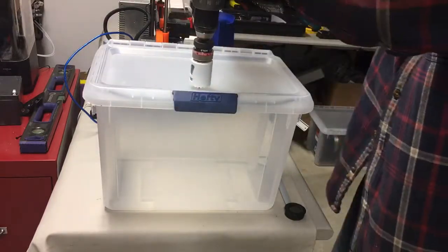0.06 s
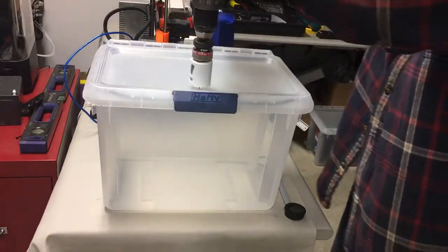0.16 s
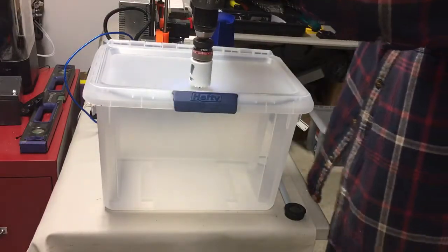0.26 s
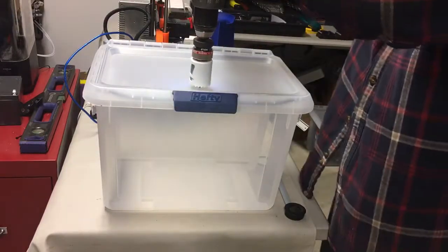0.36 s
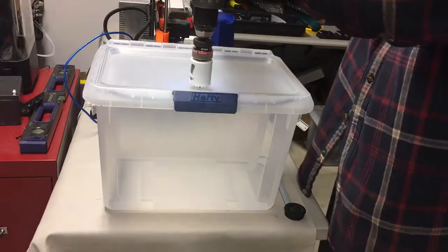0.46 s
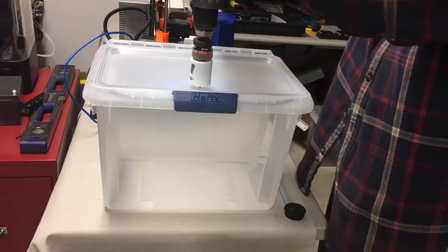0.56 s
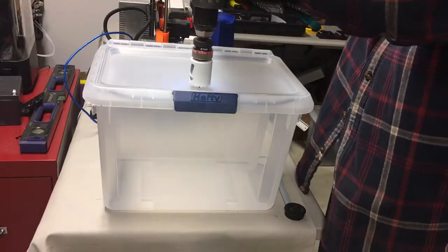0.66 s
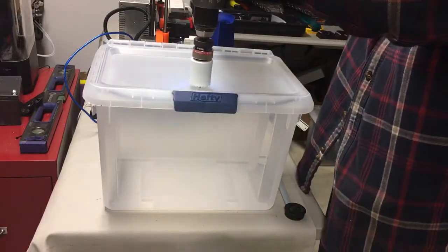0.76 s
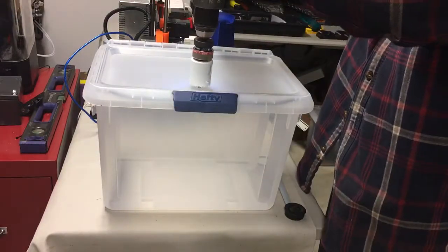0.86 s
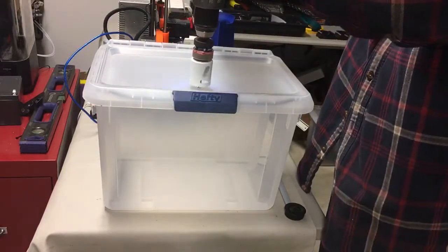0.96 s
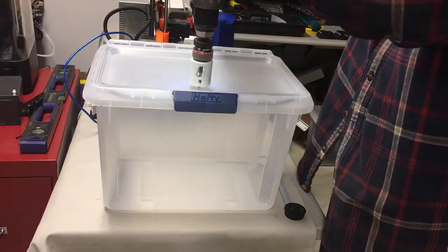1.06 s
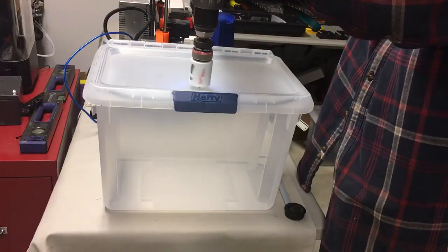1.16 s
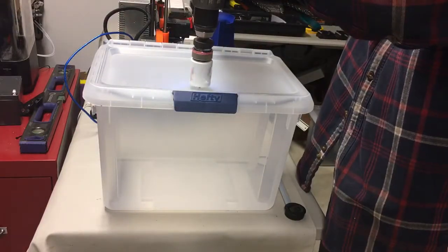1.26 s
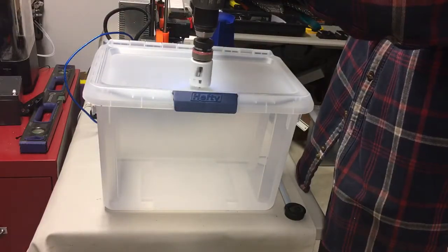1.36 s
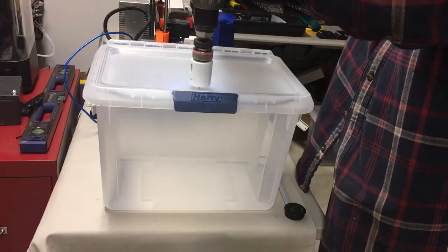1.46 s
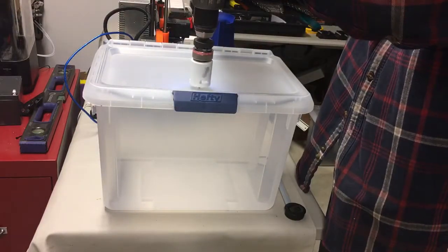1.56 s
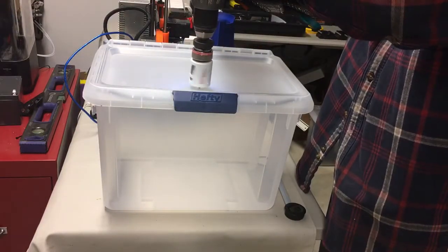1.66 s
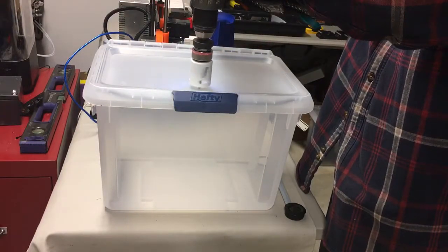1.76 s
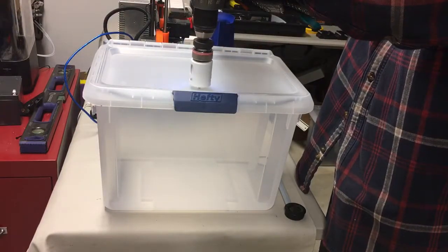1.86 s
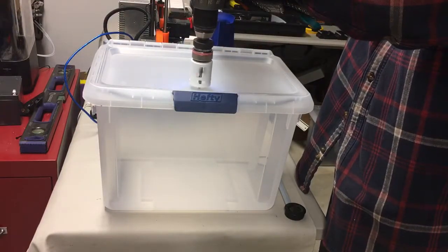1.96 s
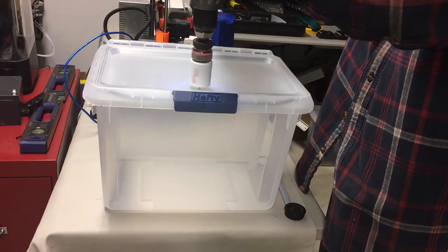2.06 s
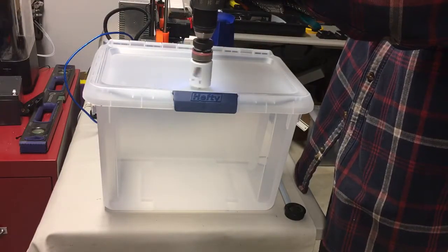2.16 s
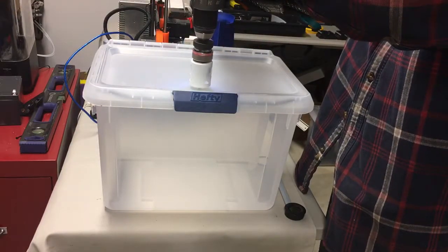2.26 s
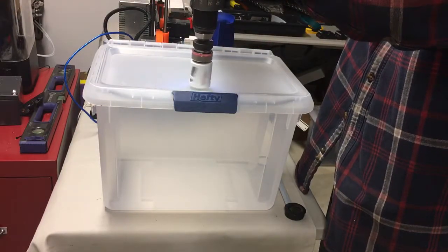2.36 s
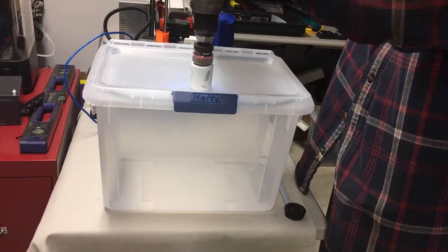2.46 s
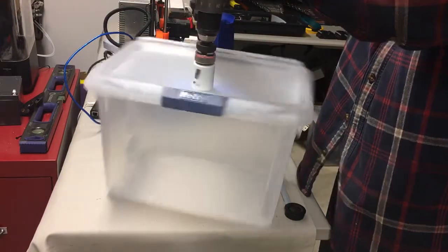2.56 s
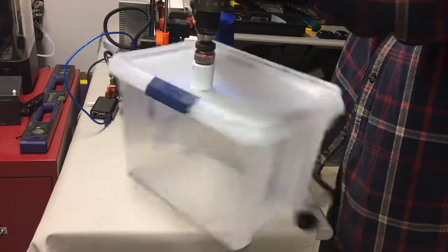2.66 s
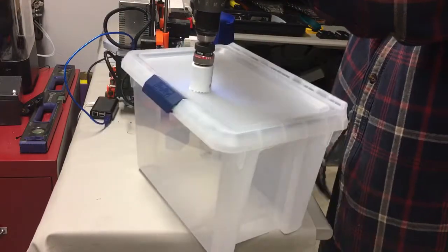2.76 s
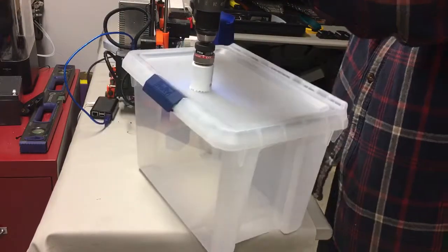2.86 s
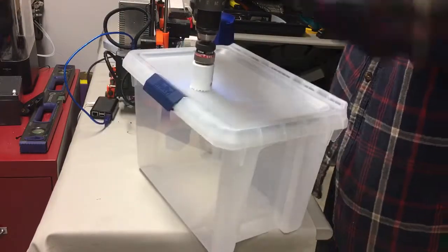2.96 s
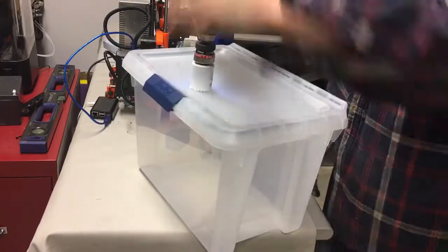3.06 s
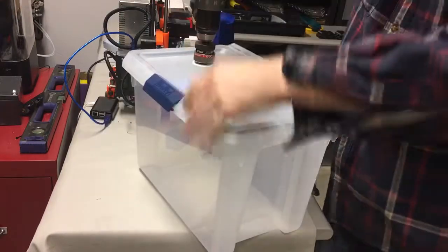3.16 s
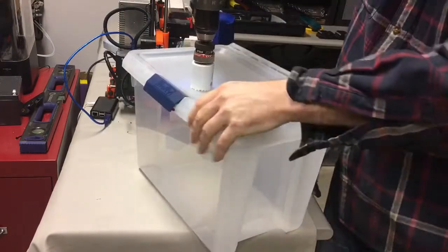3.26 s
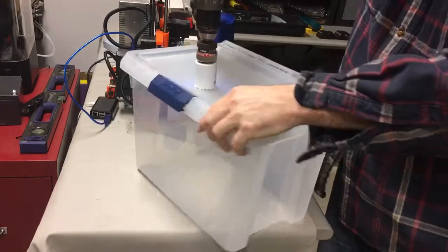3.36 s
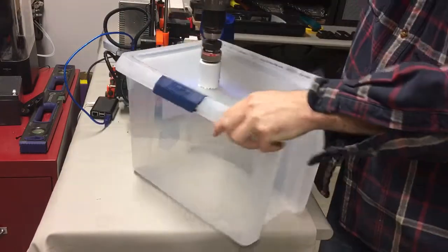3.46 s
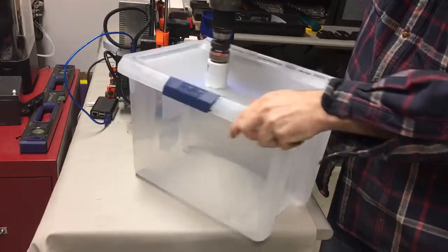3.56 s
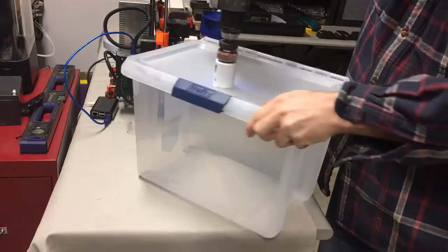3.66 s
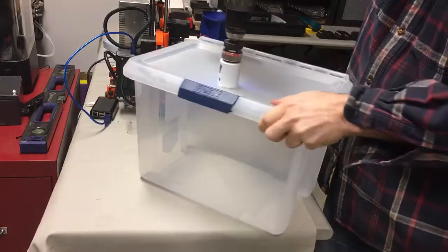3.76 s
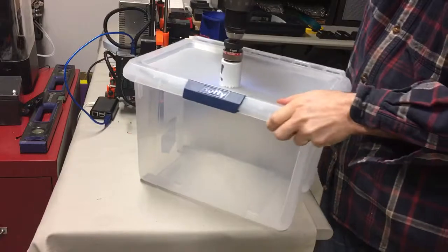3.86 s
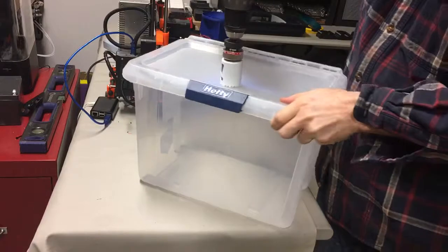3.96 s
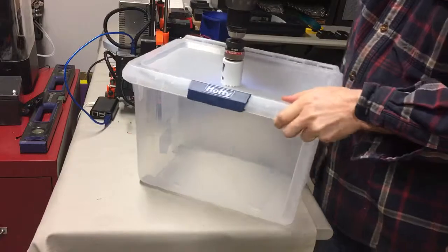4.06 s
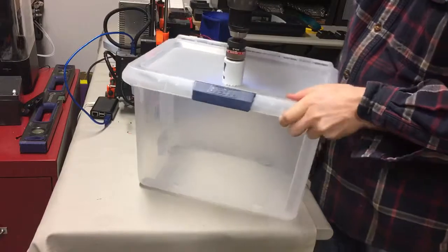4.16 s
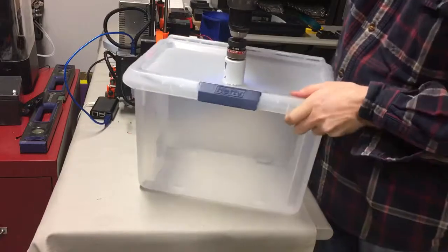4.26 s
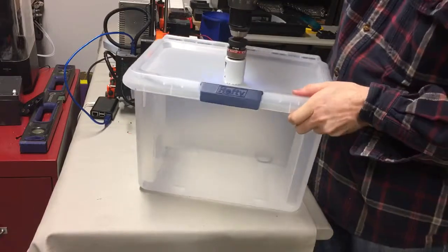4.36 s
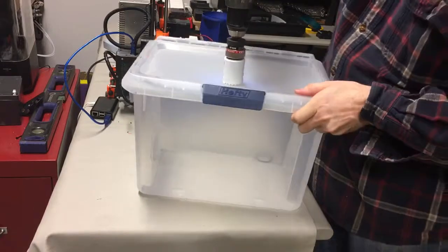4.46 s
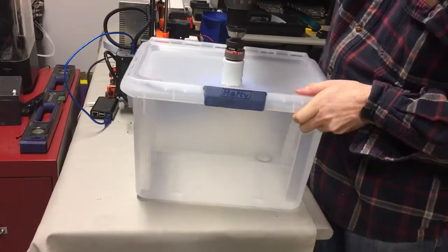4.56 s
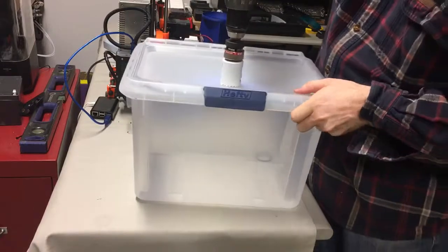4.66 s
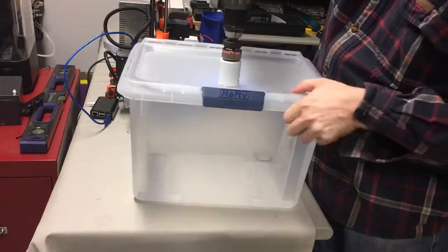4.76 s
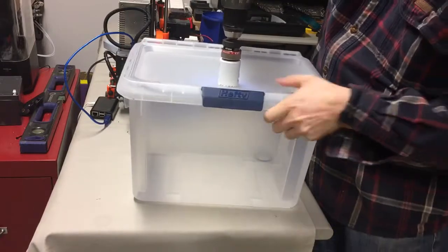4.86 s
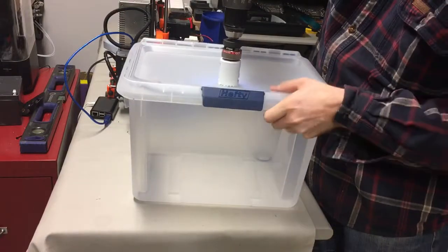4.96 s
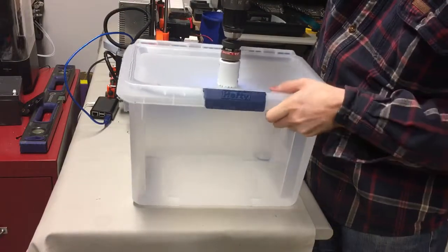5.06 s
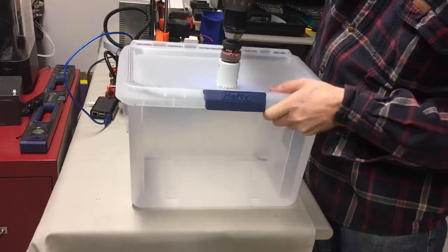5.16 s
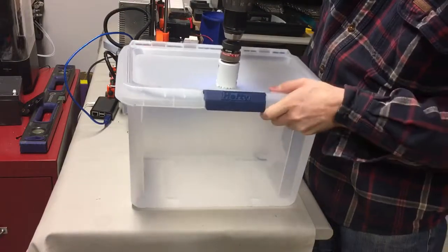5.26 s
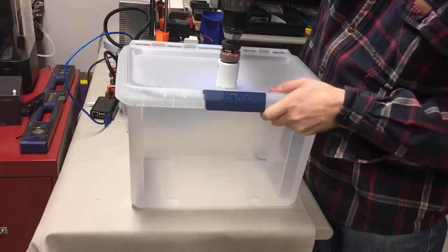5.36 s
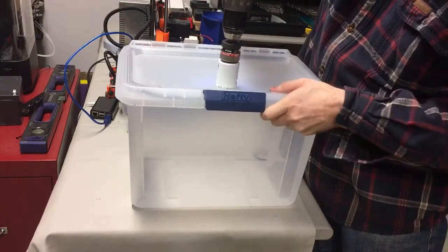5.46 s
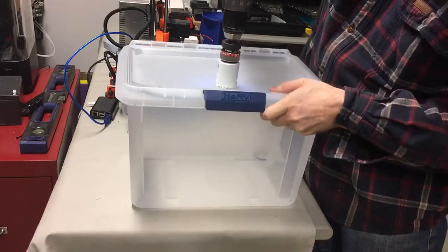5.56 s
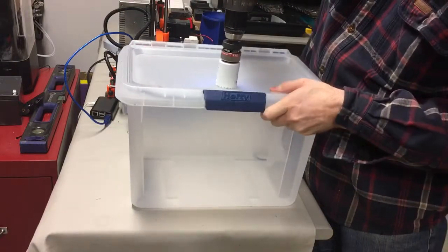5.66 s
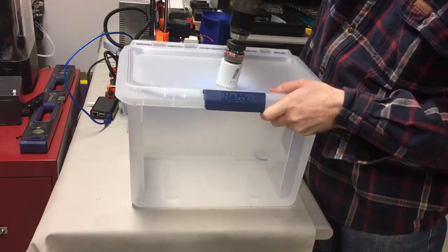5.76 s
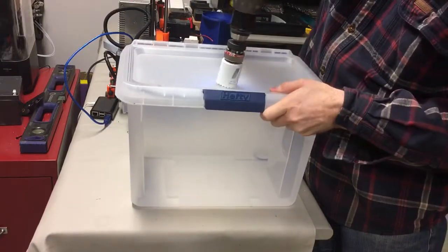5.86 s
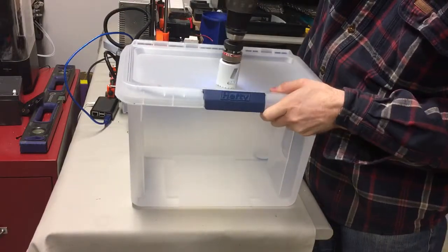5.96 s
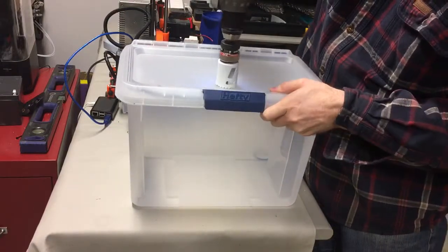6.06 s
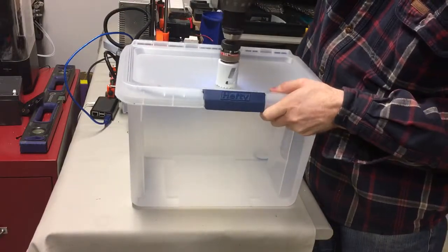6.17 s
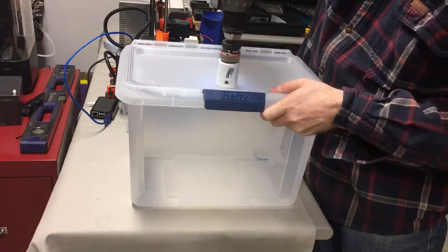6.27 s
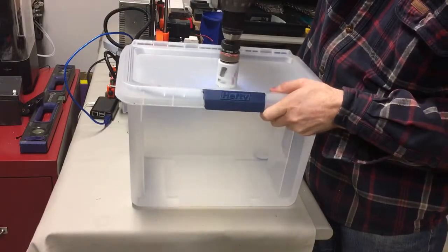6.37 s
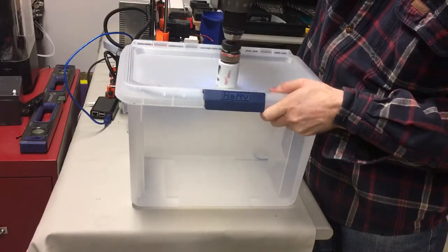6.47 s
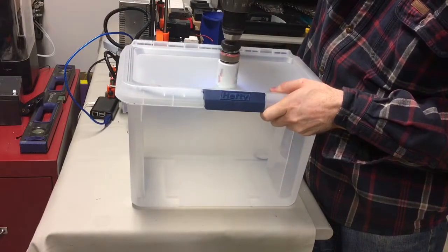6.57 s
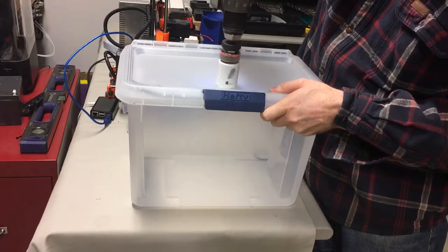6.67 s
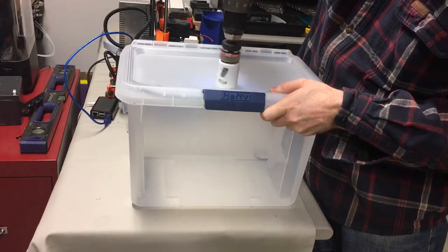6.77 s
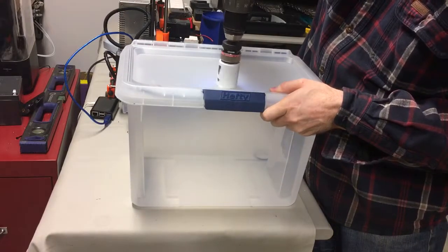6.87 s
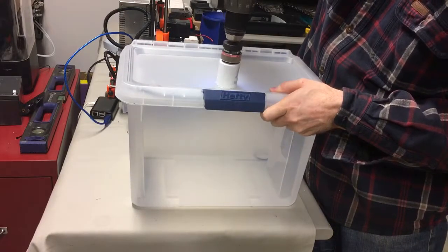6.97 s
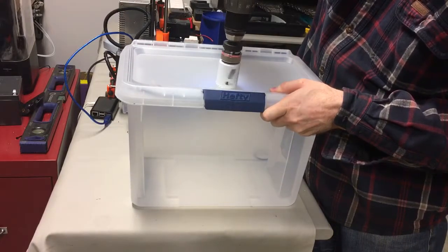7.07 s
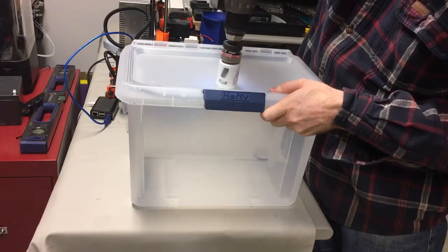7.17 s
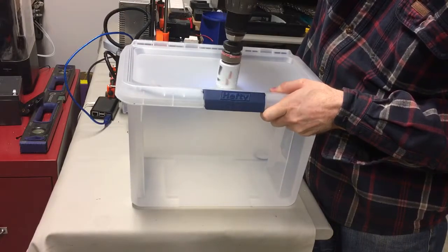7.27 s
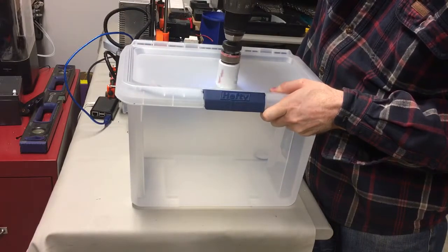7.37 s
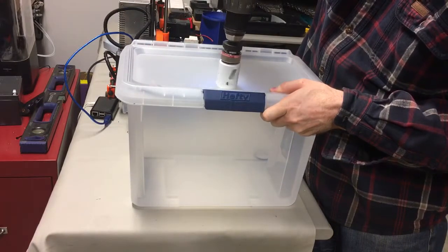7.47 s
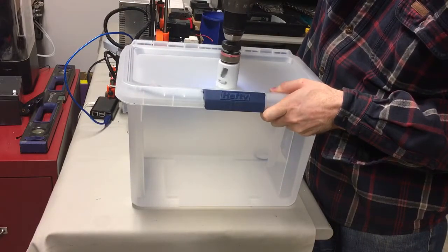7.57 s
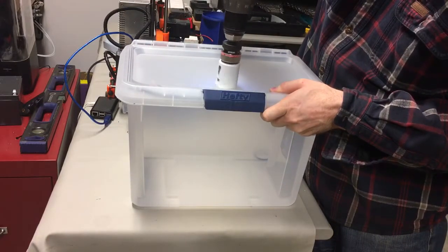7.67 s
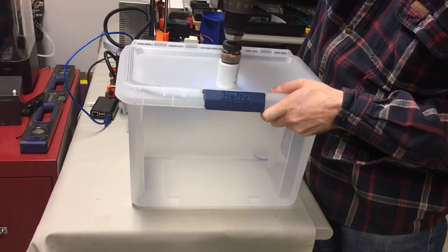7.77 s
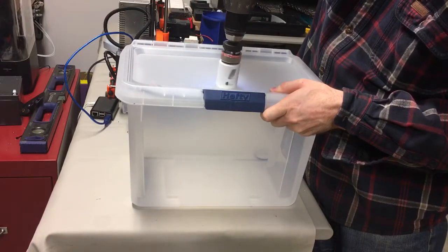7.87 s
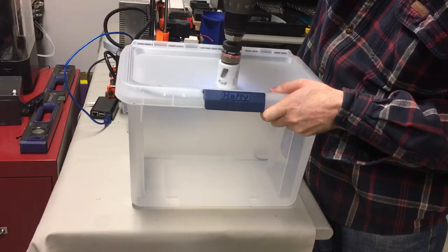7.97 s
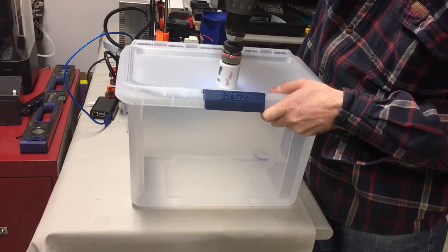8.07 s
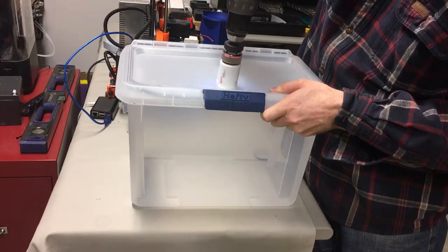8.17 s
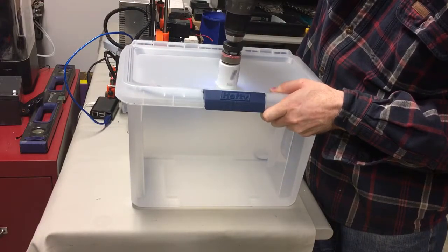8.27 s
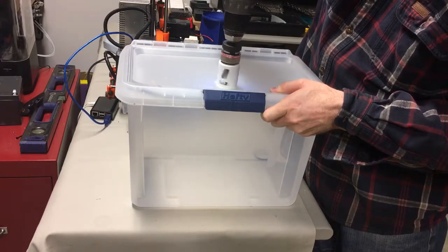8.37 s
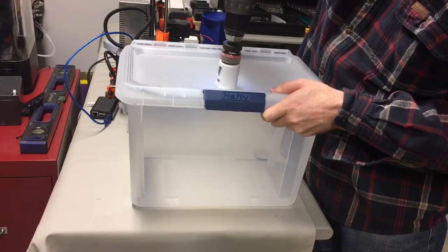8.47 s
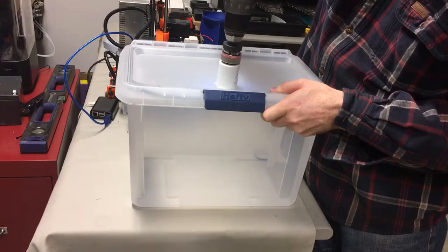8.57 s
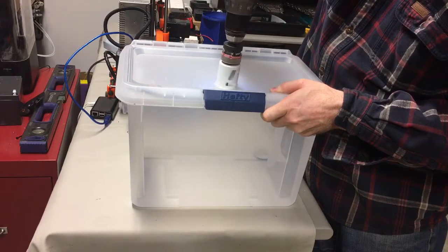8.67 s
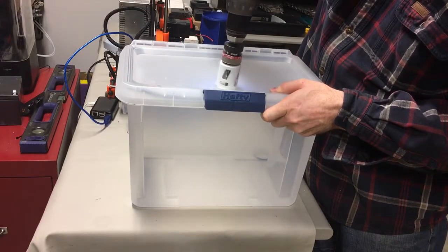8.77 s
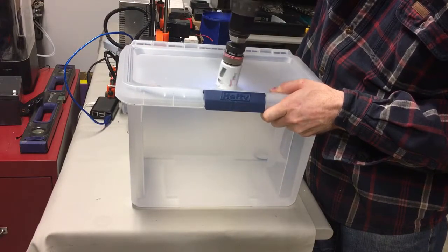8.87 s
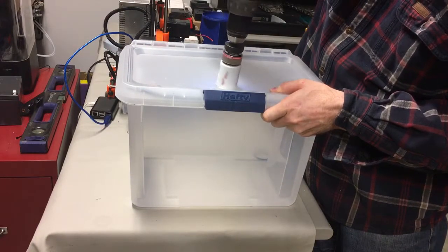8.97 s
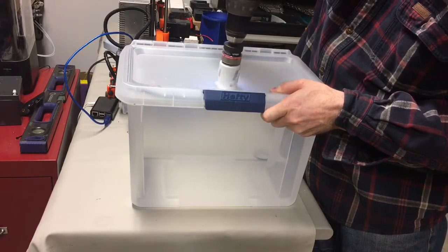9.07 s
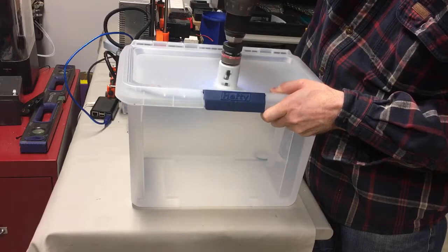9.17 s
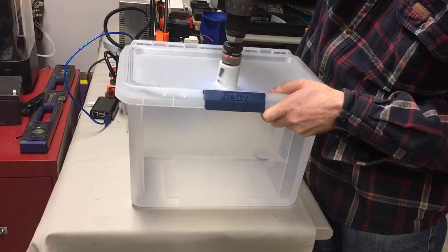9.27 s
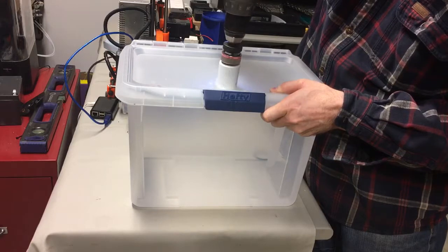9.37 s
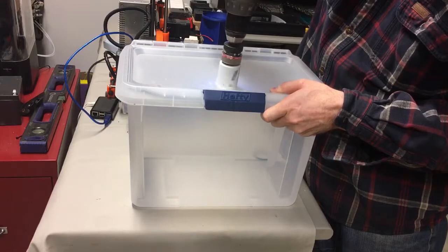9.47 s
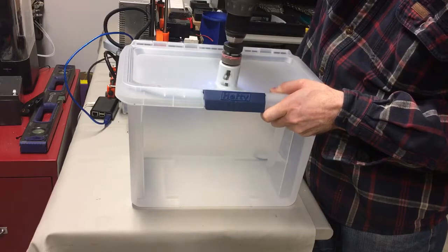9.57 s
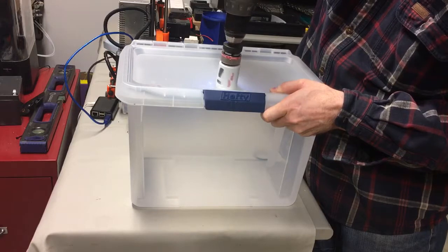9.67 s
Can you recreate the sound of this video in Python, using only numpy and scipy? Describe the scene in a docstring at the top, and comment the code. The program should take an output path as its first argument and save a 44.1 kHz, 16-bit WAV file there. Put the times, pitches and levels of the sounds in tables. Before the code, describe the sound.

A whining drill speeds up, its hole saw grabs a plastic lid with sharp cracks, then rasps on steadily with brief squeals.

```python
"""A brushless drill turns a hole saw on the lid of a plastic storage box in a small workshop.
Magnetic forces hum, gears mesh and the controller whines as the motor speeds up in three steps.
The saw grabs, swings the box round and snaps free with steel clicks. The box is set down and slid
back over the bench, friction exciting its walls. After one short burst the saw rasps slowly and
steadily, its teeth chipping the plastic; now and then it binds or the lid squeals."""
import sys
import numpy as np
from scipy import signal
from scipy.fft import rfft, irfft, next_fast_len
from scipy.io import wavfile
from scipy.ndimage import uniform_filter1d, map_coordinates

SR = 44100
rng = np.random.default_rng(int(sys.argv[2]) if len(sys.argv) > 2 else 0)


def transcribe(signal):
    """Save signal, clipped to [-1, 1], as a 16-bit WAV file at the path in sys.argv[1]."""
    frames = np.atleast_2d(signal).T
    limited = np.clip(frames, -1, 1)
    pcm = np.round(limited * 32767).astype(np.int16)
    wavfile.write(sys.argv[1], SR, pcm)


N = 429093

# Levels in the tables are relative: each source applies its own gain.
# reverberation time of the workshop: frequency_hz, t60_s
ROOM_DECAY = [(100, 0.61), (300, 0.81), (1800, 0.79), (5000, 0.64), (9000, 0.49), (14000, 0.3)]
# steady hum tones: pitch_hz, level_db, start_s
HUM_TONES = [(53, -60, 2.55), (75, -66.5, -1), (120, -70.5, -1)]

# spectral envelopes: frequency_hz, level_db
AIR_SPECTRUM = [(15, -61.5), (25, -32.5), (37, -12.5), (75, -3.5), (91, -3.5), (104, -22), (144, -2.5),
                (169, -14), (523, -27.5), (10400, -42.5), (14300, -42), (15500, -57.5)]
FRICTION_SPECTRUM = [(290, -26), (500, -3.5), (769, -13.5), (1040, -2.5), (1290, -3.5), (4910, -8.5),
                     (5510, -8.5), (15500, -20.5)]
DRONE_SPECTRUM = [(71, -59), (120, -27), (148, -8.5), (252, 2.5), (319, -13.5), (359, -5.5), (394, -12),
                  (900, -17.5), (1170, -52), (1980, -120)]
JUDDER_SPECTRUM = [(70, -15.5), (170, 1.5), (320, -9.5), (550, 2), (1200, -3), (2200, -24), (4500, -47.5),
                   (16000, -36.5)]
KNOCK_SPECTRUM = [(60, -29), (100, -13), (150, -5.5), (250, -3.5), (450, -5.5), (700, -7), (1200, -3),
                  (2200, -3.5), (3500, -6.5), (6000, -10.5), (10000, -11.5), (16000, -22)]
CRACK_SPECTRUM = [(100, -27.5), (500, -19), (1300, -6.5), (1900, -10.5), (2550, 0), (4000, -7.5),
                  (5100, -8.5), (5800, -1), (7000, -13), (10000, -6), (16000, -19.5)]
RASP_SPECTRUM = [(70, -34.5), (160, 3.5), (250, -1), (370, 1.5), (480, -8.5), (900, -7.5), (1200, -2.5),
                 (2100, -7), (2700, -5.5), (4200, -10.5), (4900, -14.5), (6500, -10), (7500, -18),
                 (16000, -25)]
RATTLE_SPECTRUM = [(100, -19.5), (300, -20), (700, -18.5), (2100, -15), (2950, -3), (3700, -8.5),
                   (4900, -12.5), (5950, 1), (7000, -14), (9300, -12), (10600, -20.5), (12200, -20),
                   (14500, -30.5), (16000, -33)]
GEAR_CASE_SPECTRUM = [(500, -22), (1300, -11), (2100, -4), (2400, -3), (2780, 5), (3500, 1), (4400, -2),
                      (5200, -1), (6400, -4), (7500, -14), (10000, -26)]
HOUSING_SPECTRUM = [(100, -14.5), (600, -10.5), (1100, -3), (2100, -9), (2850, 7.5), (3500, -14),
                    (4800, -23.5), (5900, -2), (8000, -24.5), (14000, -17)]
# normal modes of the box walls and the steel saw cup: frequency_hz, bandwidth_hz, level_db
WALL_MODES = [(163, 60, 9), (178, 14, 0), (252.4, 13, 6.5), (365, 52, 4), (1046, 33, -9), (1188, 23, -2.5),
              (2630, 150, 1.5)]
CUP_MODES = [(3170, 1100, -10.5), (6660, 610, -3), (7700, 1200, -3.5), (9500, 1000, -6.5),
             (11000, 1600, -11.5), (13200, 480, 2), (14500, 1800, -17.5)]

# sleeve brushes, jerks of the box and squeals of the lid: start_s, length_s, level_db
BRUSHES = [(-0.02, 0.077, -64), (0.112, 0.072, -61.5), (0.21, 0.06, -70)]
JERKS = [(2.645, 0.11, -23.5), (2.738, 0.058, -23)]
SQUEALS = [(5.745, 0.09, -25), (6.35, 0.08, -36.5), (8.1, 0.18, -37.5), (8.78, 0.36, -33)]
# pushes of the box over the bench: start_s, length_s, drone_db, hiss_db
PUSHES = [(2.94, 0.11, -53.5, -64.5), (3.04, 0.1, -60, -56), (3.64, 0.28, -59, -54.5),
          (3.92, 1.3, -63, -62.5), (4.19, 0.18, -55, -55), (4.46, 0.19, -52, -54.5), (4.78, 0.1, -53, -76),
          (4.925, 0.097, -46, -83.5), (5.06, 0.24, -56.5, -57), (5.24, 0.12, -57.5, -69)]
# knocks of the box on the bench: start_s, level_db, t60_s, contact_cutoff_hz
KNOCKS = [(2.659, -20, 0.027, 4000), (2.7448, -15.5, 0.014, 2880), (3.1555, -16, 0.018, 3020),
          (3.173, -32.5, 0.043, 1510), (3.52, -44, 0.14, 254), (3.848, -50, 0.052, 4000),
          (3.9065, -20.5, 0.016, 4000), (3.909, -26.5, .11, 318), (3.92, -42, 0.15, 4000),
          (3.932, -37, 0.05, 493), (3.995, -53, 0.04, 700), (6.104, -42.5, 0.038, 2500)]
# the box foot catching, the lid cracking or ticking, saw and chuck clicking: start_s, level_db, t60_s
FOOT_CATCHES = [(4.794, -43.5, 0.07), (4.831, -42.5, 0.06), (4.926, -49, 0.03), (4.969, -43, 0.027)]
LID_SNAPS = [(3.1555, -10, 0.0065), (3.1725, -4.5, 0.0079), (3.183, -24, 0.47), (3.21, -21, 0.066),
             (3.301, -21, 0.015), (3.322, -30, 0.015), (3.362, -17.5, 0.014), (4.207, -45, 0.008),
             (4.512, -37, 0.0058), (5.483, -56, 0.0076), (6.073, -41, 0.0088), (6.104, -45, 0.0047),
             (6.143, -59, 0.0049)]
STEEL_CLICKS = [(3.173, -12.5, 0.033), (3.3642, -7, 0.0037), (3.38, -27.5, 0.27), (3.4805, -24, 0.0095),
                (3.486, -6.5, 0.0046), (3.5645, -8, 0.0016), (3.5925, -42, .008)]
# partials of the squeal: harmonic_number, level_db
SQUEAL_PARTIALS = [(1, -0.5), (2, -21), (3, -3), (4, -19)]

# Motor speed is expressed as twice the electrical frequency, in Hz.
# trigger pulls: start_s, end_s, start_buzz_db, whine_db, motor_tones_db, rattle_db
TRIGGER_PULLS = [(0.701, 2.665, -55, -38, -49.5, -45), (5.702, 5.84, -45, -34.5, -54.5, -37.5),
                 (6.252, 9.8, -51.5, -37, -47, -37)]
# new speed at each squeeze or jam: start_s, speed_hz, lag_s
SPEED_STEPS = [(0.698, 159.4, 0.031), (1.094, 362, 0.09), (1.627, 550.8, 0.083), (2.524, 460, 0.02),
               (5.707, 316, 0.019), (6.253, 94.3, 0.025), (6.359, 228.8, 0.018), (6.52, 254.6, 0.25)]
# the saw binding in its groove: centre_s, half_length_s, speed_lost_hz
BINDS = [(7.331, 0.26, 20.3), (7.552, 0.053, 7.5), (7.899, 0.15, 21.6), (8.231, 0.13, 35),
         (8.916, 0.13, 57), (9.124, 0.11, 17.9), (9.322, 0.082, 12.7), (9.587, 0.14, 14.6)]
# the teeth biting into the lid: start_s, end_s, rasp_db, rattle_change_db, mesh_change_db
BITES = [(2.321, 2.526, -48, 3, -0.5), (2.524, 2.679, -36.5, 6, 5), (5.716, 5.859, -36.5, -7, -2),
         (6.352, 9.8, -41, -11.5, 1)]
# sidebands of the switching tone: offset_in_speed_multiples, level_db
SIDEBANDS = [(-5, -13), (-4, -16), (-2, -15), (-1, 1.5), (0, -27), (1, 2), (2, -19), (4, -30.5), (7, -20)]
# partials of the gear mesh: harmonic_number, level_db
MESH_PARTIALS = [(1, -12), (2, -2), (3, -3), (4, -5), (5, -4), (6, -3.5), (7, -8), (8, -11)]
# magnetic orders of the motor: speed_multiple, level_db
MAGNETIC_ORDERS = [(1, -15), (2, -5.5), (3, -6.5), (4, -9), (5, -7), (7, -7), (8, -9), (11, -20.5),
                   (14, -20), (17, -9.5), (20, -12)]

CUTTING_HZ, FULL_SPEED_HZ = 250, 700  # reference speed; speed at which current chopping would cease
BRAKE_S, BITE_RAMP_S = 0.04, 0.031


def amp(db):
    """Amplitude ratio of a level in decibels."""
    return 10 ** (np.asarray(db) / 20)


def unit(x):
    """Normalisation to an rms of 1."""
    return x / np.sqrt(np.mean(x ** 2) + 1e-20)


def along(points, hz):
    """Interpolation of (frequency_hz, value) points on a logarithmic frequency axis."""
    frequencies, values = np.transpose(points)
    return np.interp(np.log(hz + 1), np.log(frequencies), values)


def wobble(rate):
    """Smooth random modulation: a spline through rate knots a second."""
    knots = rng.standard_normal(int(N * rate / SR) + 4)
    coarse = np.arange(0, N + 32, 32)
    return np.interp(np.arange(N), coarse, map_coordinates(knots, [coarse * rate / SR]))


def held(start, end, ramp_s):
    """Trapezoidal gate with ramps centred on start and end."""
    t = np.arange(N) / SR
    return np.clip(.5 + np.minimum(t - start, end - t) / ramp_s, 0, 1)


def strokes(table, column=2):
    """Envelope of strokes that rise faster than they fade; column selects the level."""
    skew, softness = 0.8, 1.6
    out = np.zeros(N)
    for row in table:
        progress = (np.arange(N) / SR - row[0]) / row[1]
        inside = (progress > 0) & (progress < 1)
        out[inside] += amp(row[column]) * np.abs(np.sin(np.pi * progress[inside] ** skew)) ** softness
    return out


def filtered(x, response):
    """Linear filtering: the spectrum is multiplied by a frequency response."""
    size = next_fast_len(len(x) + SR // 4)
    return irfft(rfft(x, size) * response(np.fft.rfftfreq(size, 1 / SR)), size)[:len(x)]


def coloured(x, spectrum):
    """Minimum-phase filtering: folding the cepstrum makes the response causal."""
    size = 4096
    cepstrum = irfft(np.log(amp(along(spectrum, np.fft.rfftfreq(size, 1 / SR)))))
    cepstrum[1:size // 2] *= 2
    cepstrum[size // 2 + 1:] = 0
    impulse_response = irfft(np.exp(rfft(cepstrum)))
    return signal.fftconvolve(x, impulse_response)[:len(x)]


def resonate(x, modes):
    """Modal superposition: damped resonators add with alternating sign."""
    return filtered(x, lambda f: sum(
        (-1) ** k * amp(db) * 1j * f * width / (hz * hz - f * f + 1j * f * width)
        for k, (hz, width, db) in enumerate(modes)))


def grains(rate, spread_db):
    """Shot noise: rate random impulses a second, of scattered size."""
    impulses = (rng.random(N) < rate / SR) * rng.standard_normal(N)
    return unit(impulses * amp(spread_db * rng.standard_normal(N)))


def blows(table, body):
    """Impact excitation: decaying noise bursts drive a body filter, which takes any extra columns."""
    out, t = np.zeros(N + SR), np.arange(SR // 4) / SR
    for start, db, t60, *contact in table:
        decay = amp(-60 * t / max(t60, .002))
        ring = body(decay * rng.standard_normal(len(t)), *contact)
        out[round(start * SR):][:len(t)] += amp(db) * ring * np.linalg.norm(decay) / np.linalg.norm(ring)
    return out[:N]


def background():
    """Ambient noise floor: still air and a wavering low hum, later joined by a deeper one."""
    t = np.arange(N) / SR
    hum = np.zeros(N)
    for hz, db, start in HUM_TONES:
        envelope = amp(db + 4.7 * wobble(7)) * held(start, N / SR + 1, .1)
        hum += envelope * np.sin(2 * np.pi * hz * t + 1.1 * wobble(12))
    return hum + amp(-63.5) * unit(coloured(rng.standard_normal(N), AIR_SPECTRUM))


def room(x):
    """Diffuse reverberation: each frequency decays exponentially at its own rate."""
    hz, t, noise = signal.stft(rng.standard_normal(SR), SR, nperseg=256)
    decay = amp(-60 * t / along(ROOM_DECAY, hz)[:, None])
    tail = signal.istft(noise * decay, SR, nperseg=256)[1]
    tail *= 1 - np.exp(-np.arange(len(tail)) / SR / 0.0029)  # reflections build up
    return signal.fftconvolve(x, tail / np.linalg.norm(tail))[:N]


def sleeve():
    """Friction of brushing cloth radiates soft broadband noise."""
    return strokes(BRUSHES) * unit(coloured(rng.standard_normal(N), FRICTION_SPECTRUM))


def knock_response(x, cutoff_hz):
    """Contact compliance acts as a low-pass filter: a softer knock on the box is duller."""
    return filtered(coloured(x, KNOCK_SPECTRUM), lambda hz: 1 / (1 + 1j * hz / cutoff_hz) ** 2)


def box():
    """Friction and impact excite the box as it judders round, lands and slides over the bench."""
    judder = amp(-5) * strokes(JERKS) * unit(coloured(grains(900, spread_db=7.5), JUDDER_SPECTRUM))
    knocks = blows(KNOCKS, knock_response)
    drone = amp(-1.5) * strokes(PUSHES) * unit(coloured(grains(1200, spread_db=0), DRONE_SPECTRUM))
    friction = unit(coloured(grains(12000, spread_db=5), FRICTION_SPECTRUM))
    hiss = amp(0.5) * strokes(PUSHES, column=3) * friction
    foot_modes = [(724, 410, 4), (1360, 390, 4.5), (2160, 550, -3.5)]
    catches = blows(FOOT_CATCHES, lambda x: resonate(x, foot_modes))
    return judder + knocks + drone + hiss + catches


def lid_snaps():
    """Sudden release of strain: the lid cracks off the teeth and later ticks as it flexes."""
    return blows(LID_SNAPS, lambda x: coloured(x, CRACK_SPECTRUM))


def steel_clicks():
    """Free vibration: clicks of saw and chuck briefly ring the modes of the steel cup."""
    return blows(STEEL_CLICKS, lambda x: resonate(x, CUP_MODES))


def lid_squeal():
    """Stick-slip friction against the saw drives the lid at an unsteady pitch."""
    pitch_hz = 1035 * (1 + 0.035 * wobble(160))
    phase = 2 * np.pi * np.cumsum(pitch_hz) / SR
    tone = sum(amp(db + 1.4 * wobble(60)) * np.sin(k * phase) for k, db in SQUEAL_PARTIALS)
    return amp(-8) * strokes(SQUEALS) * tone


def free_speed():
    """First-order lag: the motor approaches each new speed exponentially and brakes on release."""
    stops = [(end, 0, BRAKE_S) for _, end, *_ in TRIGGER_PULLS]
    speed = np.zeros(N)
    for start, hz, lag in sorted([tuple(step) for step in SPEED_STEPS] + stops):
        first = round(start * SR)
        if first < N:
            speed[first:] = hz + (speed[first] - hz) * np.exp(-np.arange(N - first) / SR / lag)
    return speed


def bind_drag():
    """Load slows the motor: the speed lost in each bind, in Hz, follows a bell curve."""
    t = np.arange(N) / SR
    return sum(hz * np.exp(-((t - centre) / half) ** 2) for centre, half, hz in BINDS)


def with_speed(speed, octave_db):
    """Power law: gain is 1 at cutting speed and grows by octave_db per doubling."""
    return amp(octave_db * np.log2(speed / CUTTING_HZ + 1e-9))


def bite_db(column):
    """Level change under cutting load, held while each bite lasts."""
    return sum(bite[column] * held(bite[0], bite[1], BITE_RAMP_S) for bite in BITES)


def trigger_gain(column):
    """Gain gated by each trigger pull, held on for one braking time constant."""
    return sum(amp(pull[column]) * held(pull[0], pull[1] + BRAKE_S, .01) for pull in TRIGGER_PULLS)


def rattle_gain(speed, drag):
    """Gear impacts grow stronger with speed and with the load of a bind."""
    load = amp(bite_db(column=3) + 0.1593 * drag)
    return trigger_gain(column=5) * load * with_speed(speed, octave_db=5)


def cut_gain(speed, drag):
    """Strength of the cutting excitation: the teeth skim lightly, then bite in uneven surges."""
    skim = amp(-59.5) * with_speed(speed, octave_db=5)
    bite = sum(amp(db) * held(start, end, BITE_RAMP_S) for start, end, db, *_ in BITES)
    return np.maximum(skim, bite) * amp(0.46 * wobble(9) - 0.0118 * drag)


def saw(angle, cut, drag):
    """Forced vibration: chipping teeth rasp and shake the box, which rumbles less as the groove deepens."""
    chips = grains(3500, spread_db=-1) * amp(1.5 * wobble(70) + 0.76 * np.sin(angle / 8))
    rasp = unit(coloured(chips, RASP_SPECTRUM))
    bass = filtered(rasp, lambda hz: 1 / (1 + (hz / 500) ** 4))
    walls = unit(resonate(chips, WALL_MODES))
    t = np.arange(N) / SR
    cutting_s = sum((t - start) * held(start, end, BITE_RAMP_S) for start, end, *_ in BITES)
    rumble_gain = amp(1.5 - 0.88 * cutting_s + 0.0572 * drag + 1.8 * wobble(8))
    return cut * (amp(1.5) * (rasp - bass) + rumble_gain * (bass + amp(-10.5) * walls))


def controller_whine(angle, speed, drag):
    """Modulation: rotation splits the switching tone into sidebands that spread with speed."""
    switching_hz = 9731
    carrier = 2 * np.pi * switching_hz * np.arange(N) / SR
    sidebands = sum(amp(db) * np.sin(carrier + k * angle) for k, db in SIDEBANDS)
    powered = sum(amp(db) * held(on + 0.0055, off, 0.0124) for on, off, _, db, *_ in TRIGGER_PULLS)
    ripple = 0.28 + 0.65 * np.sin(np.pi * speed / FULL_SPEED_HZ) ** 2  # greatest at half speed
    # for a moment at each start the controller switches at half the rate
    starting = sum(amp(db) * held(on, on + 0.017, 0.0024) for on, _, db, *_ in TRIGGER_PULLS)
    buzz = np.sin(carrier / 2) + np.sin(carrier) + 0.74 * np.sin(1.5 * carrier)
    return amp(-3 - 0.03 * drag) * powered * ripple * sidebands + starting * buzz


def gear_rattle(angle, speed, rattle):
    """Tooth impacts grow denser with speed and excite a housing resonance under acceleration."""
    teeth = grains(1500 + 14 * speed, spread_db=0) * (1 + 0.12 * np.sin(angle / 4))
    acceleration = uniform_filter1d(np.gradient(speed) * SR, size=600)
    strain = np.clip(acceleration / 1000, 0, 1) * np.clip(speed / 70, 0, 1) / (1 + (speed / 380) ** 4)
    clatter = unit(coloured(teeth, RATTLE_SPECTRUM))
    housing_ring = unit(resonate(resonate(teeth, [(2980, 480, 0)]), [(3060, 1400, 0)]))
    return amp(-3) * rattle * clatter + amp(-50.5) * strain * housing_ring


def gear_mesh(angle, drag, rattle, cut):
    """Periodic tooth contact radiates harmonics through the gear case, louder under cutting load."""
    backlash = .14 * wobble(80)  # play in the gears smears the tones
    phase = 2.815 * angle + backlash
    tones = sum(amp(db + 2 * wobble(45)) * np.sin(k * phase) for k, db in MESH_PARTIALS)
    load = np.sqrt(rattle * cut) * amp(-2.73 + bite_db(column=4) + 0.0087 * drag)
    return load * coloured(tones, GEAR_CASE_SPECTRUM)


def motor(angle, speed, cut):
    """Periodic magnetic forces drive the housing at multiples of the motor speed."""
    forces = sum(amp(db + wobble(25)) * np.sin(k * angle + rng.uniform(0, 2 * np.pi))
                 for k, db in MAGNETIC_ORDERS)
    damping = 1 + cut / amp(-13.5)  # pressing on the saw damps the housing
    flutter = amp(4 * np.clip(cut / amp(-47.5), 0, 1) * wobble(45))  # from the biting teeth
    saw_angle = angle / 100
    swell = amp(0.5 * np.sin(2 * saw_angle))  # twice in each turn of the saw
    gain = amp(1.5) * trigger_gain(column=4) * with_speed(speed, octave_db=11.5) * swell
    return gain * coloured(forces * flutter / damping, HOUSING_SPECTRUM)


def scene():
    """Superposition of direct and reverberant sound at one point; speed and load govern the drill."""
    drag = bind_drag()
    speed = np.abs(free_speed() - drag)
    rattle, cut = rattle_gain(speed, drag), cut_gain(speed, drag)
    jitter = 0.00299 * wobble(30) + 0.3 * cut * wobble(90)  # cutting makes the speed less steady
    angle = 2 * np.pi * np.cumsum(speed * (1 + jitter)) / SR
    drill = motor(angle, speed, cut) + gear_mesh(angle, drag, rattle, cut)
    drill += gear_rattle(angle, speed, rattle)
    work = drill + saw(angle, cut, drag) + lid_squeal() + box() + lid_snaps() + sleeve()
    whine, steel = controller_whine(angle, speed, drag), steel_clicks()
    # the room returns less of the high-pitched whine and clicks
    reverberation = room(amp(-4.5) * work + amp(-8.5) * whine + amp(-5.5) * steel)
    mono = work + whine + steel + reverberation + background()
    return np.array([mono, mono])


def record(dry):
    """Soft saturation rounds the loudest cracks; a band-pass drops deep bass and the highest treble."""
    ceiling, low_hz, top_hz = .66, 32, 15800
    clipped = dry / (1 + (dry / ceiling) ** 6) ** (1 / 6)
    band = lambda hz: hz ** 3 / (hz ** 3 + low_hz ** 3) / (1 + (hz / top_hz) ** 200)
    return np.array([filtered(x, band) for x in clipped])


dry = scene()
out = record(dry)
transcribe(out)
```